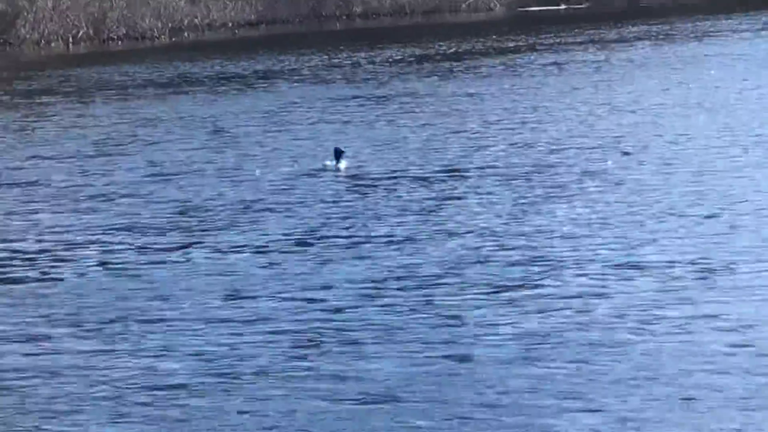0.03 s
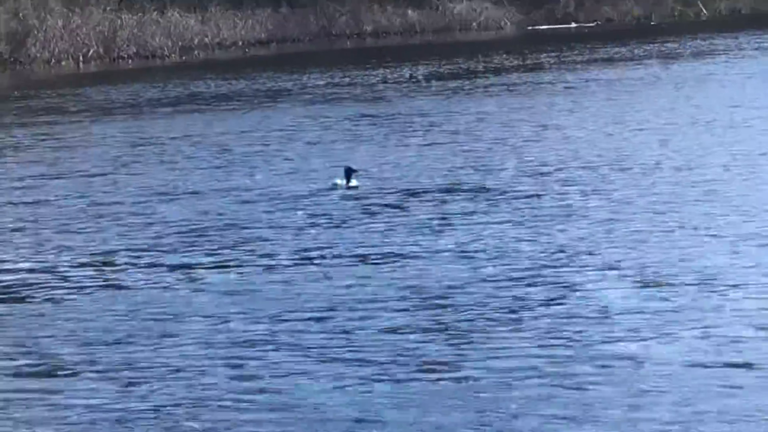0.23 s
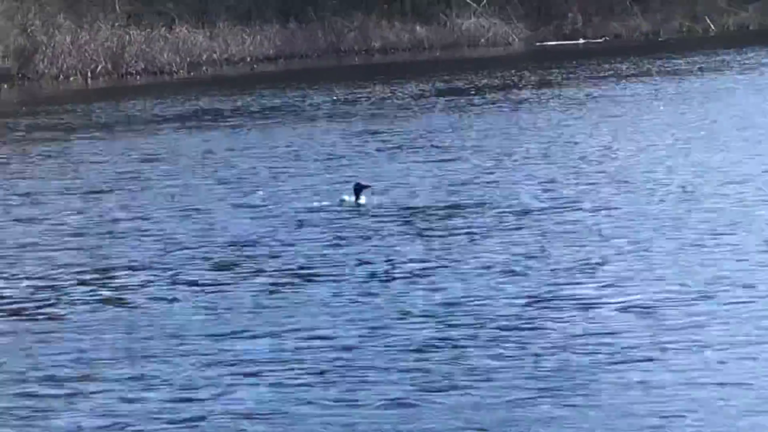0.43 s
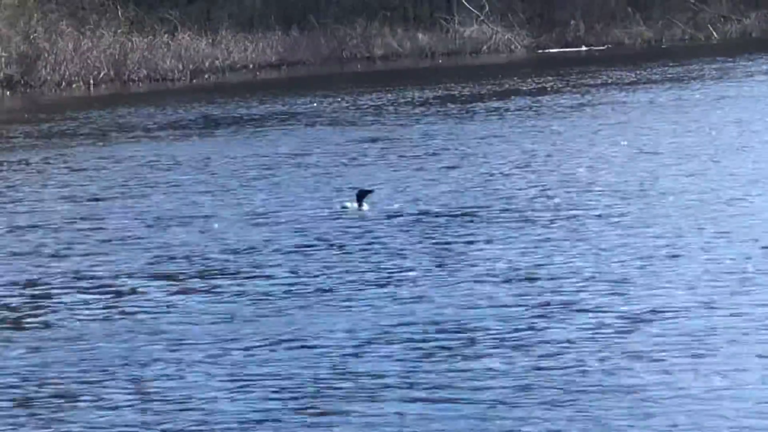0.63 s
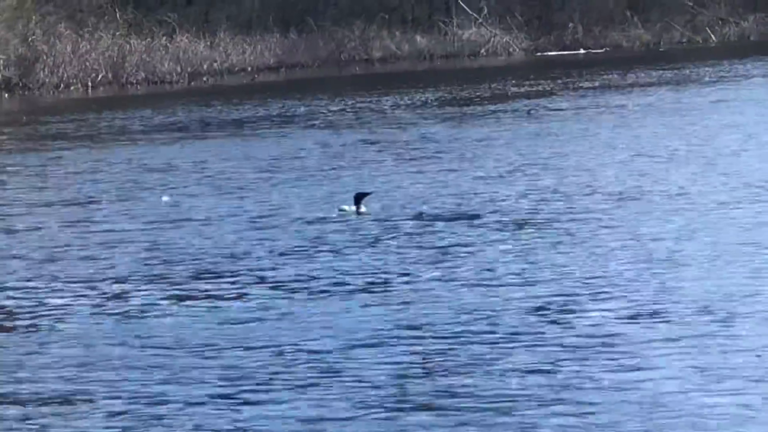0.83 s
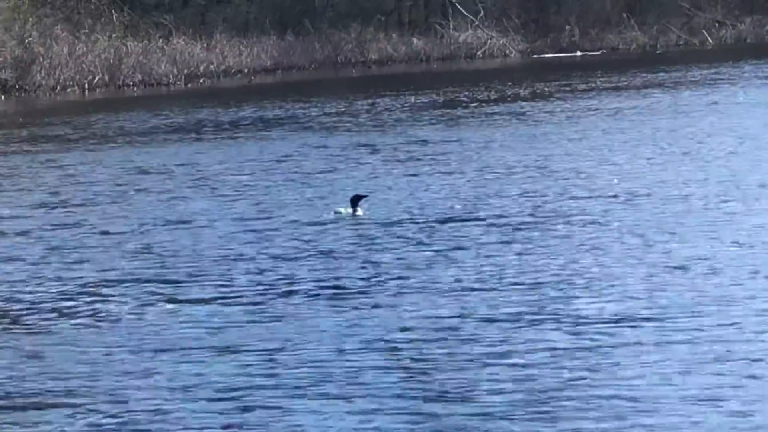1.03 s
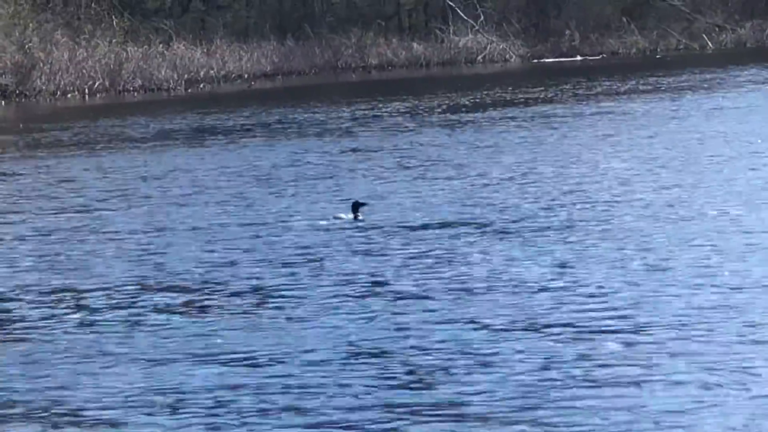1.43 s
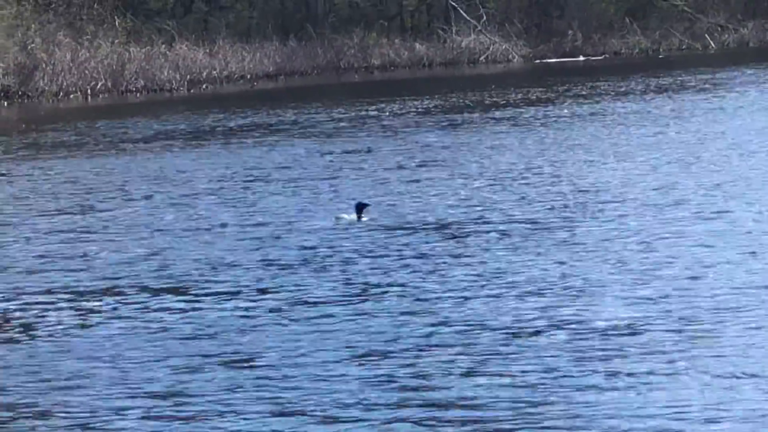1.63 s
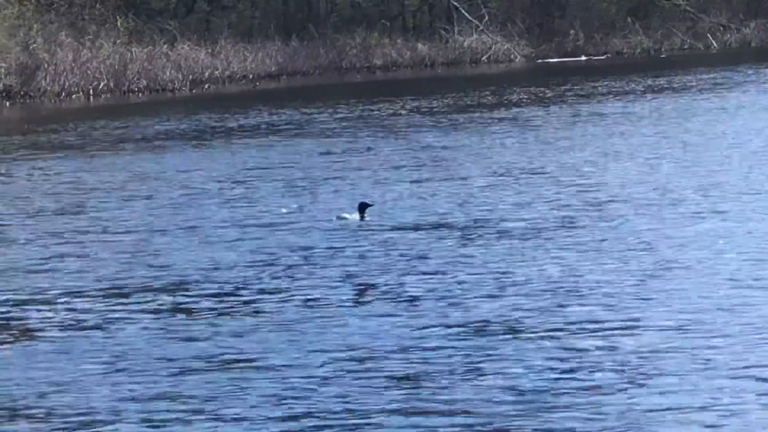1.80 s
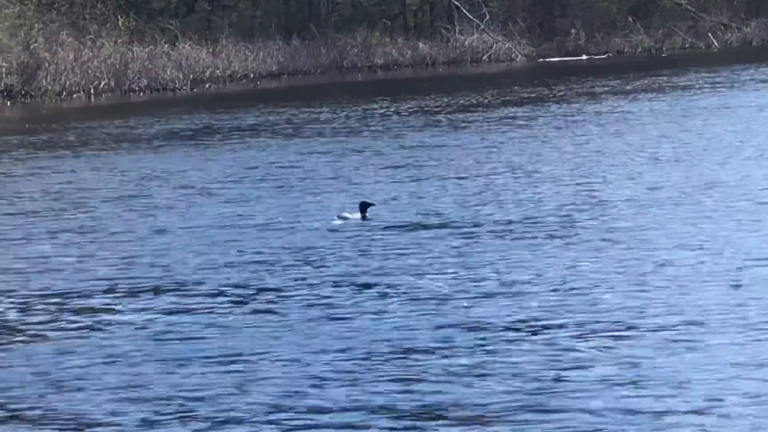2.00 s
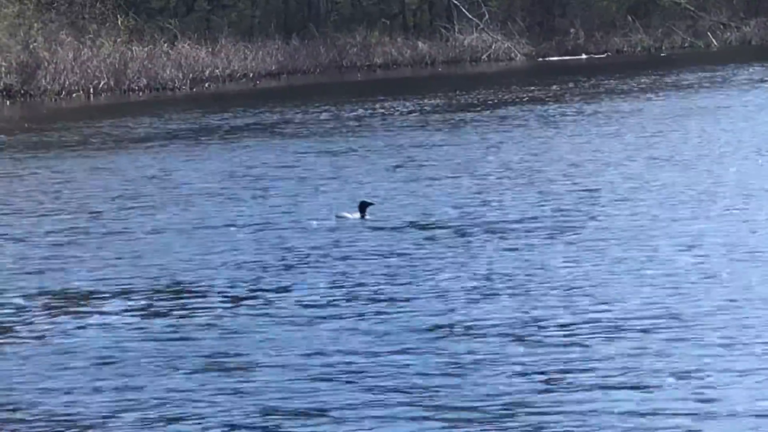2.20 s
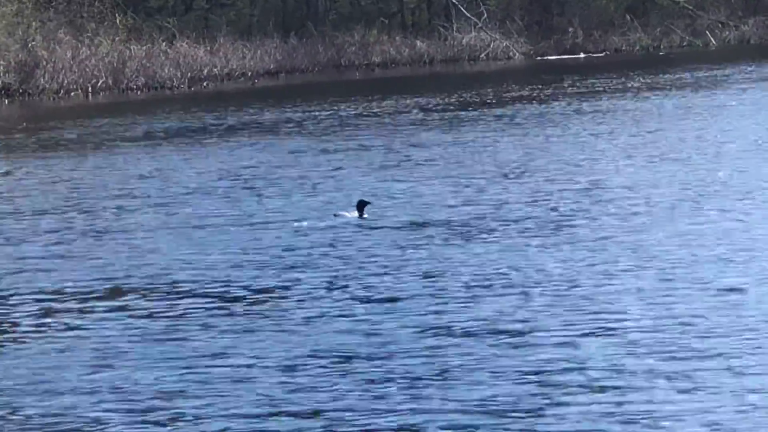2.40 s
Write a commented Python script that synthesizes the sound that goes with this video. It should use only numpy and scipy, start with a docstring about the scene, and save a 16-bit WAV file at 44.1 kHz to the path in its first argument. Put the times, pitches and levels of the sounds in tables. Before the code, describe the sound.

Low, gusting wind rumble on the microphone, with short dull buffets, beside a lake.

```python
"""A low, gusting rumble of wind on the microphone, on a lakeshore. The turbulent airflow grows
louder and brighter as it quickens, and single eddies strike as short, dull buffets.
Behind it lies the even wash of distant wind and rippled water, with a fine rustle over it.
A few tiny dry ticks sound close by, one of them trailed by a faint, thin whistle."""
import sys
import numpy as np
from scipy import signal
from scipy.io import wavfile
from scipy.ndimage import uniform_filter1d

SR = 44100
rng = np.random.default_rng(int(sys.argv[2]) if len(sys.argv) > 2 else 0)


def wav_out(sig):
    """Save sig, one row per channel (or a flat mono array), as 16-bit PCM at SR to the path in sys.argv[1]."""
    wavfile.write(sys.argv[1], SR, np.round(np.clip(np.atleast_2d(sig).T, -1, 1) * 32767).astype(np.int16))


N = 112454
TIME = np.arange(N) / SR


def from_db(db):
    """Amplitude ratio of a level in decibels."""
    return 10 ** (np.asarray(db) / 20)


def unit_power(x):
    """Normalisation to a mean square of one."""
    return x / np.sqrt(np.mean(x ** 2) + 1e-20)


def evened(x, span_s):
    """Division by the running rms holds the power near one."""
    size = int(span_s * SR)
    power = uniform_filter1d(uniform_filter1d(x ** 2, size), size)
    return x / np.sqrt(np.abs(power) + 1e-12)


def in_time(rows):
    """Linear interpolation of (seconds, value) rows at every sample."""
    return np.interp(TIME, *np.transpose(rows))


def band_noise(low_hz, high_hz, order=2):
    """Band-limited noise of unit power, taken after the filter has settled."""
    sos = signal.butter(order, [low_hz, high_hz], "band", fs=SR, output="sos")
    return unit_power(signal.sosfilt(sos, rng.standard_normal(N + SR // 4))[-N:])


def drift(corner_hz):
    """Slow random modulation: noise through a two-pole low-pass, at unit power."""
    pole = np.exp(-2 * np.pi * corner_hz / SR)
    slow = signal.lfilter([1], [1, -2 * pole, pole * pole], rng.standard_normal(N + SR))
    return unit_power(slow[SR:])


def noise_bands(spectrum, count):
    """Incoherent powers add: a spectrum as (centre Hz, noise) bands of unit total power."""
    hz, db = np.transpose(spectrum)
    edges = np.geomspace(hz[0], hz[-1], count + 1)
    centres = np.sqrt(edges[1:] * edges[:-1])
    shares = from_db(np.interp(np.log(centres), np.log(hz), db)) * np.sqrt(np.diff(edges))
    shares /= np.linalg.norm(shares)
    return [(centre, share * band_noise(low, high, order=3))
            for centre, share, low, high in zip(centres, shares, edges, edges[1:])]


def burst(noise, envelope):
    """Amplitude modulation of noise, scaled to carry the energy of the envelope."""
    shaped = noise * envelope
    return shaped / np.sqrt(np.sum(shaped ** 2) / np.sum(envelope ** 2))


# Spectrum of distant wind and ripples. Each row: frequency in Hz, relative spectral density in dB.
WASH_SPECTRUM = [(150, -2.5), (400, 2), (600, -2), (1000, -0.5), (1400, -5.5), (1800, -12), (2200, -11),
                 (2450, -17.5), (2900, -17.5), (3300, -22), (4000, -24.5), (5000, -29.5), (7000, -34),
                 (9000, -36.5), (11500, -40.5), (15500, -38)]
# Course of the wash. Each row: time in seconds, level in dB.
WASH_LEVELS = [(0, -52.5), (1.0, -52.5), (2.0, -51.5), (2.55, -51.5)]

def wash():
    """Incoherent sources, far wind in trees and small waves, sum to a smooth, barely wavering hiss."""
    waver_db = 1.1
    hiss = sum(band * from_db(waver_db * drift(corner_hz=9.3))
               for _, band in noise_bands(WASH_SPECTRUM, count=40))
    return from_db(in_time(WASH_LEVELS)) * hiss


# Course of the fine rustle. Each row: time in seconds, level in dB.
RUSTLE_LEVELS = [(0, -83), (.55, -83.5), (.95, -73.5), (1.2, -75), (1.8, -80), (1.95, -77), (2.15, -77),
                 (2.35, -77), (2.49, -73.5), (2.55, -67)]

def rustle():
    """Shot noise: dense random impulses of uneven size merge into a faint, grainy hiss."""
    grains_per_s, spread_db, band_hz = 2500, 2.5, [2310, 4700]
    clicks = (rng.random(N) < grains_per_s / SR) * rng.choice([-1, 1], N)
    sizes = from_db(spread_db * np.minimum(rng.exponential(1, N), 5))
    grains = signal.sosfilt(signal.butter(1, band_hz, "band", fs=SR, output="sos"), clicks * sizes)
    return from_db(in_time(RUSTLE_LEVELS)) * unit_power(grains)


def whistle():
    """Narrow-band noise is heard as a thin pitch; it follows one tick, its power falling linearly."""
    start_s, length_s, pitch_hz, width_hz, level_db = .912, .07, 5500, 310, -71.5
    progress = (TIME - start_s) / length_s
    fade = (progress > 0) * np.sqrt(np.clip(1 - progress, 0, 1))
    hiss = band_noise(pitch_hz - width_hz / 2, pitch_hz + width_hz / 2)
    return from_db(level_db) * burst(hiss, fade)


# Tiny dry ticks. Each row: start in seconds, approximate peak level in dB, pitch in Hz,
# time to decay by 60 dB in seconds, level of the snap relative to the ring in dB.
TICK_EVENTS = [(.657, -55, 4740, 0.014, -10), (.71, -59, 3780, 0.034, -27),
               (0.8997, -44.5, 4500, 0.011, -13.5), (1.3352, -48.5, 4430, .008, -5),
               (1.926, -57.5, 5400, .025, -9), (2.077, -56, 4800, 0.015, -17),
               (2.2601, -44.5, 3100, 0.02, -25), (2.4367, -47, 4300, .016, -41),
               (2.487, -47.5, 4020, 0.028, -9), (2.515, -66, 5200, .02, -23)]
# Resonances of a tick. Each row: frequency as a multiple of the pitch, relative level in dB.
TICK_RESONANCES = [(1, 12.5), (1.22, -11.5), (1.8, -7)]

def ticks():
    """Heavy damping broadens a resonance: three noise bands and a broad snap decay exponentially."""
    half_width_hz, crest_factor = 455, 2
    snap = band_noise(low_hz=3000, high_hz=10000, order=1)
    out = np.zeros(N)
    for start_s, peak_db, hz, t60_s, snap_db in TICK_EVENTS:
        decay = (TIME >= start_s) * from_db(-60 * np.clip((TIME - start_s) / t60_s, 0, 2))
        ring = sum(from_db(db) * band_noise(hz * ratio - half_width_hz, hz * ratio + half_width_hz)
                   for ratio, db in TICK_RESONANCES)
        tick = burst(ring, decay) + from_db(snap_db) * burst(snap, decay)
        out += from_db(peak_db) / crest_factor * tick
    return out


# Spectrum of an eddy breaking up. Each row: frequency in Hz, relative spectral density in dB.
RASP_SPECTRUM = [(270, 2.5), (330, 2), (450, 0.5), (600, -9), (780, -13.5), (950, -23.5), (1150, -39.5)]
# Eddies striking the microphone. Each row: centre in seconds, Gaussian half-width in seconds,
# level of the swell in dB, pitch in Hz, level of the rasp in dB.
EDDIES = [(.392, 0.012, -20, 115, -51), (0.422, 0.016, -17.5, 139.7, -27), (0.457, 0.017, -24.5, 163, -35),
          (0.562, 0.015, -24.5, 150, -46), (0.66, 0.014, -33, 126, -47), (.755, 0.0048, -29, 194, -58),
          (0.839, 0.015, -36.5, 232, -38.5), (0.867, 0.01, -21, 129.5, -37),
          (0.908, 0.0055, -22.5, 128, -53), (0.938, 0.0095, -22, 127.6, -42.5),
          (1.047, 0.0079, -21, 126, -60.5), (1.137, 0.0095, -29, 168, -49), (1.153, 0.0034, -21, 131, -56),
          (1.321, 0.0048, -19.5, 162, -40.5), (1.411, .011, -19.5, 129.6, -54),
          (1.622, 0.0042, -20, 175, -45.5), (1.669, 0.0068, -15.5, 127, -29.5),
          (1.694, 0.013, -14, 78.3, -51), (1.7007, 0.0026, -21, 191, -26), (1.736, 0.005, -23.5, 223, -44),
          (1.819, 0.0041, -29, 135, -63), (1.95, 0.0076, -21, 111, -48.5), (2.008, 0.0096, -24, 105.3, -50),
          (2.128, .008, -26.5, 102, -70), (2.245, .010, -24, 115.4, -74), (2.382, 0.07, -36, 81, -73)]

def buffets():
    """An eddy is a swell of pressure swings, rasping at its crest as the flow breaks up on the port."""
    edge_ratio, evening_s, rasp_sharpness, bass_limit_hz = 1.417, .013, 2.84, 42
    reference_top_hz, reference_width_s = 616, .012
    broken_flow = sum(band for _, band in noise_bands(RASP_SPECTRUM, count=8))
    out = np.zeros(N)
    for centre_s, half_width_s, swell_db, hz, rasp_db in EDDIES:
        swell = np.exp(-.5 * ((TIME - centre_s) / half_width_s) ** 2)
        swings = evened(band_noise(hz / edge_ratio, hz * edge_ratio, order=3), evening_s)
        out += from_db(swell_db) * burst(swings, swell)
        # The rasp of a shorter eddy reaches higher.
        top_hz = reference_top_hz * (reference_width_s / half_width_s) ** .45
        rasp = signal.sosfilt(signal.butter(3, top_hz, fs=SR, output="sos"), broken_flow)
        out += from_db(rasp_db) * burst(evened(rasp, evening_s), swell ** rasp_sharpness)
    return signal.sosfilt(signal.butter(3, bass_limit_hz, "high", fs=SR, output="sos"), out)


# Strength of the airflow at the microphone. Each row: time in seconds, level of the rumble in dB.
FLOW_LEVELS = [(0, -35.5), (.14, -35), (.23, -29), (.32, -35.5), (.43, -24), (.52, -26), (.7, -34),
               (.8, -30.5), (.87, -28), (1.0, -35), (1.13, -27.5), (1.2, -34), (1.28, -29), (1.55, -28),
               (1.78, -25), (1.87, -31.5), (2.0, -30), (2.12, -39), (2.24, -27.5), (2.31, -46.5),
               (2.45, -36), (2.55, -46.5)]
# Turbulence at the reference flow. Each row: frequency in Hz, relative spectral density in dB.
TURBULENCE_SPECTRUM = [(25, -33), (35, -24), (48, 1.5), (70, -0.5), (100, 2), (150, 1.5), (200, -8.5),
                       (270, -12), (350, -19.5), (460, -27), (600, -32), (900, -44.5), (1500, -59)]

def rumble():
    """Turbulent pressure fluctuation: a faster flow is louder and sheds smaller, higher eddies."""
    reference_db, flutter_db = -26.5, 4.5
    pivot_hz, tilt_per_octave = 129, .099   # extra dB per dB of flow, per octave above the pivot
    flow_db = in_time(FLOW_LEVELS)
    excess_db = flow_db - reference_db + flutter_db * drift(corner_hz=22.5)
    air = np.zeros(N)
    for hz, band in noise_bands(TURBULENCE_SPECTRUM, count=18):
        octaves = np.clip(np.log2(hz / pivot_hz), -1, 2)
        air += band * from_db(excess_db * (1 + tilt_per_octave * octaves))
    # Evening keeps the changing brightness and the fastest flutter; the flow sets the level.
    return from_db(flow_db) * evened(air, span_s=.024)


def scene():
    """Superposition, in one channel, of the wind on the microphone and the sounds of the shore."""
    return (rumble() + buffets() + wash() + rustle() + ticks() + whistle())[None]


def record(dry):
    """Band limiting: a steep elliptic low-pass removes the highest treble."""
    cutoff_hz = 15750
    return signal.sosfilt(signal.ellip(12, .1, 80, cutoff_hz, fs=SR, output="sos"), dry)


dry = scene()
out = record(dry)
wav_out(out)
```